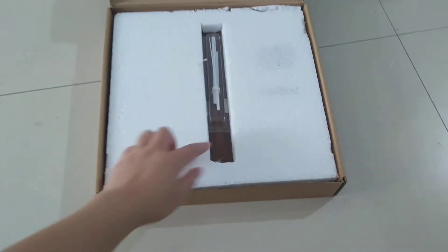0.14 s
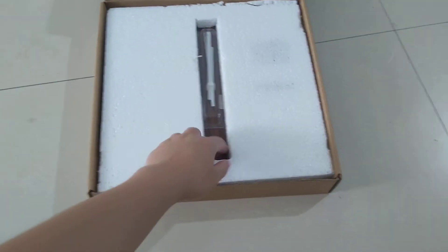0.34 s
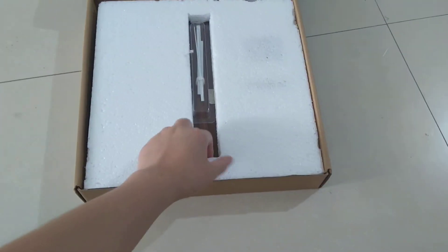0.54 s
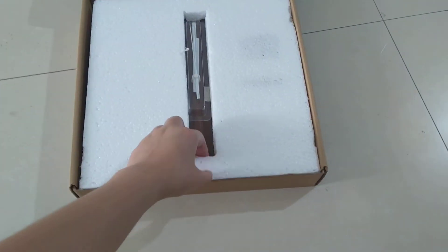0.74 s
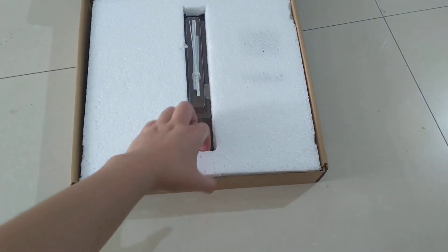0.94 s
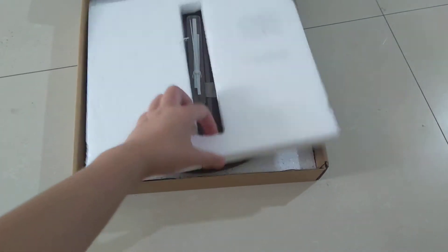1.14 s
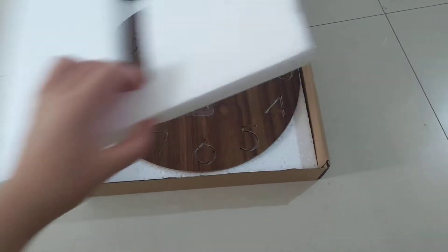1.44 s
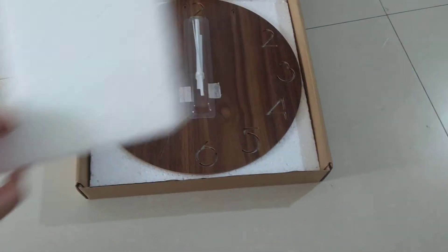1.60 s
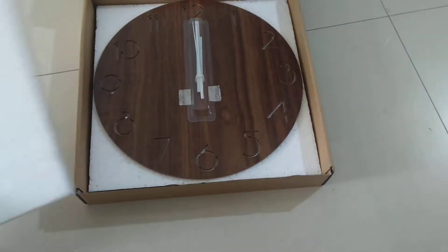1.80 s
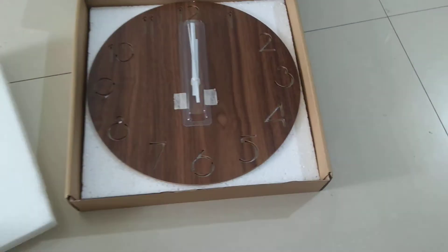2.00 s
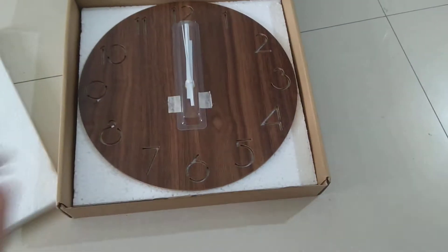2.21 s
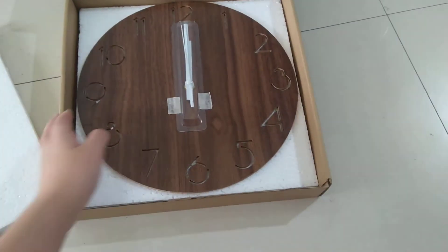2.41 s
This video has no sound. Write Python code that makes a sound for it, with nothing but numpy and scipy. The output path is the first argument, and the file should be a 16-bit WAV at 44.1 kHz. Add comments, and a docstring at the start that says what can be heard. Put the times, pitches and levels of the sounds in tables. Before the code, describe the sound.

Crisp foam rubbing against skin and cardboard, loudest in the first half and thinning later, after a brief hollow rattle with short room echo. Small snaps and dull bumps follow over low rumble, mostly on the right.

```python
"""In a bare room with a tiled floor, a hand rubs, grips and lifts a foam sheet out of a cardboard box.
The rubbing is patchy noise and tiny slips in three bands, with snaps, bumps and squeaks of filtered noise.
Just before, something hollow knocks and rattles: decaying sines and cracks, with a noise tail for the walls.
A low rumble of shaped noise and a trace of hiss lie under it all; most of the sound leans to the right."""
import sys
import numpy as np
from scipy import signal
from scipy.fft import rfft, irfft, next_fast_len
from scipy.io import wavfile
from scipy.ndimage import uniform_filter1d, minimum_filter1d, map_coordinates

SR = 44100
rng = np.random.default_rng(int(sys.argv[2]) if len(sys.argv) > 2 else 0)


def decibels_to_gain(level_db):
    """Convert a level in decibels to a linear amplitude gain (20 dB per decade)."""
    exponent = np.asarray(level_db, float) / 20
    return 10 ** exponent


def master(y):
    """Save y as 16-bit WAV."""
    cut = np.clip(np.atleast_2d(y).T, -1, 1)
    pcm = np.round(cut * 32767)  # scale
    wavfile.write(sys.argv[1], SR, pcm.astype(np.int16))


N = 112454  # length [samples]

# left-right likeness of the foam and of the walls' answer: (frequency [Hz], likeness [0..1])
FOAM_AND_WALLS_ALIKE = [(60, 1), (150, .95), (300, 1), (600, 0.62), (1000, .4), (2400, 0.033), (6000, 0.05),
                        (15000, 0.24)]


def unit(x):
    """Scales a signal to rms 1."""
    return x / np.sqrt(np.mean(x ** 2) + 1e-20)


def along(points, hz):
    """Reads (Hz, value) points on a logarithmic frequency axis."""
    f, v = np.transpose(points)
    return np.interp(np.log(hz + 1), np.log(f + 1), v)


def wobble(rate):
    """A smooth random curve through rate random knots a second."""
    knots = rng.standard_normal(int(N * rate / SR) + 4)
    return map_coordinates(knots, [np.arange(N) * rate / SR])


def filtered(x, response):
    """Multiplies the spectrum of x by a complex response of frequency."""
    m = next_fast_len(x.shape[-1] + SR // 4)
    spectrum = rfft(x, m) * response(np.fft.rfftfreq(m, 1 / SR))
    return irfft(spectrum, m)[..., :x.shape[-1]]


def spread(pair, colour, alike=FOAM_AND_WALLS_ALIKE):
    """Colours two unrelated signals and mixes them to a left-right likeness, at rms 1."""
    def mid_side_response(hz):
        angle = np.arccos(np.clip(along(alike, hz), 0, 1)) / 2
        return decibels_to_gain(along(colour, hz)) * [np.cos(angle), np.sin(angle)]

    mid, side = filtered(pair, mid_side_response)
    return unit(np.array([mid + side, mid - side]))


def patchy(depth_db):
    """Two noises whose gain varies in random patches of time and frequency, alike in both."""
    z = signal.stft(rng.standard_normal((2, N)), nperseg=512)[2]
    field = uniform_filter1d(rng.standard_normal(z.shape[1:]), 3, 0)  # across frequency
    field = uniform_filter1d(field, 14, 1)  # across time
    return unit(signal.istft(z * decibels_to_gain(depth_db * unit(field)), nperseg=512)[1][:, :N])


def grainy(depth_db):
    """Friction as tiny slips of uneven size, mixed with patchy noise."""
    slips_per_s, size_spread_db, slip_share = 2500, 3, 0.4  # share of the power
    slips = (rng.random((2, N)) < slips_per_s / SR) * rng.standard_normal((2, N))
    slips = unit(slips * decibels_to_gain(size_spread_db * rng.standard_normal(N)))
    return np.sqrt(slip_share) * slips + np.sqrt(1 - slip_share) * patchy(depth_db)


def add(track, s, sound):
    """Lays a sound into the track at s seconds."""
    part = track[..., round(s * SR):][..., :sound.shape[-1]]
    part += sound[..., :part.shape[-1]]


def burst(hz, width_hz, envelope):
    """A stereo puff of partly shared noise through a resonance passed twice, under an envelope."""
    noise = rng.standard_normal(len(envelope)) + 1.4 * rng.standard_normal((2, len(envelope)))

    def resonance(f):
        return (1j * f * width_hz / (hz * hz - f * f + 1j * f * width_hz)) ** 2

    return envelope * unit(filtered(noise, resonance))


def rubbing():
    """Foam beads slip on skin and cardboard: a bright fizz, a duller sheet scrape, a low rub of the box."""
    # strokes, before trims: (time [s], fizz level [dB], scrape level [dB], cardboard level [dB])
    strokes = [(.3, -73, -58.5, -75), (0.34, -39.5, -28, -19), (0.38, -41.5, -27, -14),
               (0.44, -40, -33, -27), (0.54, -41, -31, -30), (0.57, -31, -30, -29.5),
               (0.69, -50.5, -53.5, -50.5), (0.73, -33.5, -37.5, -50), (0.78, -39.5, -37, -43),
               (0.79, -31.5, -35, -38.5), (0.84, -32.5, -37, -43), (0.94, -39.5, -41, -48),
               (0.98, -32.5, -34.5, -44.5), (1.03, -34, -36, -48), (1.05, -33, -35, -41),
               (1.1, -23.5, -31, -37), (1.18, -34.5, -40.5, -54), (1.19, -31, -35.5, -35.5),
               (1.27, -34, -36.5, -48), (1.35, -36.5, -39, -50), (1.37, -31, -38.5, -50),
               (1.39, -30, -41.5, -50), (1.42, -36, -41.5, -54), (1.5, -44, -48.5, -62),
               (1.51, -46.5, -50, -64), (1.62, -50, -56, -78.5), (1.66, -35, -42.5, -57.5),
               (1.69, -35, -40.5, -54), (1.71, -37, -41, -54), (1.8, -42.5, -45, -69),
               (1.82, -43.5, -44, -58), (1.88, -48.5, -49.5, -72), (1.89, -43.5, -46.5, -52),
               (1.94, -49, -50, -64.5), (1.98, -51, -47, -60), (2.0, -52, -48, -67),
               (2.02, -52.5, -48, -56), (2.06, -30.5, -36.5, -51), (2.13, -42, -43, -52),
               (2.18, -48.5, -48, -67), (2.2, -49, -51.5, -62), (2.23, -42, -39, -65),
               (2.32, -45, -43.5, -58), (2.38, -44, -47.5, -64), (2.41, -50, -42, -46),
               (2.52, -58, -52, -59), (2.55, -74, -60, -72)]
    # colour of the fizzing beads: (frequency [Hz], relative level [dB per Hz])
    fizz_colour = [(1200, -90), (2600, -10), (3500, -10), (4100, -16.5), (4970, -8), (6500, -3.5),
                   (8310, 1), (9500, -3.5), (10300, -4.5), (11100, -8.5), (15200, -8), (16000, -9),
                   (16500, -96)]
    # colour of the scraping sheet: (frequency [Hz], relative level [dB per Hz])
    scrape_colour = [(700, -90), (950, -87), (1150, -3), (1400, -1.5), (2400, 0.5), (3270, -1), (4260, -3),
                     (5500, -6), (7150, -6.5), (12000, -97)]
    # colour of the rubbed cardboard: (frequency [Hz], relative level [dB per Hz])
    card_colour = [(380, -90), (480, -20), (560, -13), (660, -4), (850, 0), (1100, -2.5), (1400, -0.5),
                   (2000, -94)]
    scrape_full_s, scrape_rise_s = 0.62, 0.068  # scrape and cardboard rise up to this time
    flutter_db, stroke_s = 0.9, 0.23
    pan_share = 0.25  # dB towards the left for each dB that the fizz stands over its surroundings

    s, fizz_db, scrape_db, card_db = np.transpose(strokes)
    t = np.arange(N) / SR
    shared_db = 0.7 * wobble(14)
    fizz_level = np.interp(t, s, fizz_db)

    fizz_gain = decibels_to_gain(fizz_level + 1.5 + shared_db + flutter_db * wobble(40))
    fizz = fizz_gain * spread(grainy(4.5), fizz_colour)
    scrape_gain = decibels_to_gain(np.interp(t, s, scrape_db) + 0.5 + shared_db + flutter_db * wobble(29.34))
    scrape = scrape_gain * spread(grainy(2.2), scrape_colour)
    card_gain = decibels_to_gain(np.interp(t, s, card_db) + 1 + shared_db)
    card = card_gain * spread(patchy(2.6), card_colour)

    rise = np.clip((t - scrape_full_s) / scrape_rise_s + 1, 0, 1)
    pan_db = pan_share * (fizz_level - uniform_filter1d(fizz_level, round(stroke_s * SR)))
    return decibels_to_gain(pan_db * [[0.5], [-0.5]]) * (fizz + (scrape + card) * rise) * (t > s[0])


def snaps():
    """Foam beads snap free, each a broad burst of noise that dies at once."""
    # beads snapping: (time [s], level [dB], centre frequency [Hz])
    beads = [(0.7128, -29.5, 8190), (0.787, -25, 8080), (0.8045, -31.5, 8480), (0.8364, -36, 8090),
             (1.5803, -34, 7980), (1.6397, -32.5, 3100), (1.735, -40, 9000), (1.8835, -38, 2580),
             (2.2169, -40, 2490), (2.2694, -40, 2760)]
    t60_s = 0.019
    out, t = np.zeros((2, N)), np.arange(SR // 4) / SR
    for s, db, hz in beads:
        add(out, s, decibels_to_gain(db) * burst(hz, 1.7 * hz, decibels_to_gain(-60 * t / t60_s)))
    return out


def bumps():
    """The sheet bumps box and floor: low bursts of noise with a soft attack."""
    # bumps, level before the attack softens them: (time [s], level [dB], centre frequency [Hz])
    thuds = [(1.128, -31.5, 217), (1.195, -29.5, 147), (1.691, -48, 151), (2.055, -38.5, 208),
             (2.217, -57, 207), (2.397, -39, 186)]
    t60_s, attack_s = 0.13, 0.0091
    out, t = np.zeros((2, N)), np.arange(SR // 4) / SR
    for s, db, hz in thuds:
        envelope = decibels_to_gain(-60 * t / t60_s) * (1 - np.exp(-t / attack_s))
        add(out, s, decibels_to_gain(db) * burst(hz, 1.85 * hz, envelope))
    return out


def squeaks():
    """Faint squeaks of foam: noise through a narrow resonance, swelling and fading."""
    # squeaks: (time [s], length [s], level [dB], frequency [Hz], width [Hz])
    chirps = [(1.88, .025, -47, 2550, 300), (2.045, .04, -37, 2520, 220), (2.08, .17, -51, 655, 30)]
    out, t = np.zeros((2, N)), np.arange(SR // 4) / SR
    for s, length, db, hz, width_hz in chirps:
        swell = np.sin(np.pi * np.clip(t / length, 0, 1))
        add(out, s, decibels_to_gain(db) * burst(hz, width_hz, swell))
    return out


def knocks():
    """Each contact cracks and rings the hollow body; the walls answer with a tail dying band by band."""
    # knocks and rattle: (time [s], relative level of ring and walls [dB], crack level [dB])
    hits = [(0.213, 0, -33), (0.2195, -4.5, -37), (0.238, -5.5, -33), (0.255, -5.5, -45), (0.284, -10, -47),
            (0.314, -5.5, -49), (0.356, -7, -43.5), (0.367, -7, -49), (0.403, -11, -45.5)]
    # modes of the hollow body: (frequency [Hz], relative level before scatter [dB], t60 [s])
    modes = [(119.8, -18, 0.93), (140.3, -19.5, 1), (597, -9, 0.9), (638, 5.5, 0.21), (700, 5, 0.0091),
             (763.7, -3, 0.17), (774, -26, 0.13), (860.6, -6, 0.6), (977, -5, 0.067), (990, -19, 0.17),
             (1058, -13, 0.078), (1244, -7, .2), (1360, -27, .2), (1588, -5, 0.16), (2222, -8, .2)]
    # colour of the knock as the walls return it: (frequency [Hz], relative level [dB per Hz])
    wall_colour = [(30, -86), (90, -22.5), (170, -23.5), (300, -19.5), (520, -17.5), (620, 2.5), (700, -13),
                   (900, -8.5), (1210, -11.5), (1500, -18.5), (2400, -21.5), (3800, -28.5), (5700, -41),
                   (8300, -38.5), (14000, -64)]
    # decay of the room: (frequency [Hz], t60 [s])
    room_t60 = [(120, .9), (300, .6), (600, .5), (1000, .48), (1800, .55), (3000, .6), (9000, .35)]
    ring_db, ring_attack_s, mode_scatter_db = -15.5, 0.00057, 2.5
    walls_db, walls_build_s = -12.5, 0.0018
    crack_t60_s = 0.0046

    out, t = np.zeros((2, N)), np.arange(SR) / SR
    for s, db, crack_db in hits:
        ring = np.zeros((2, SR))
        for mode_hz, level, t60 in modes:
            mode_db = level + mode_scatter_db * rng.standard_normal((2, 1))  # per channel
            ring += decibels_to_gain(mode_db - 60 * t / t60) * np.sin(2 * np.pi * mode_hz * t)
        add(out, s, decibels_to_gain(db + ring_db) * ring * (1 - np.exp(-t / ring_attack_s)))

        add(out, s, decibels_to_gain(crack_db - 60 * t / crack_t60_s) * rng.standard_normal(SR))

        noise = spread(rng.standard_normal((2, SR)), wall_colour)
        hz, frames, z = signal.stft(noise, SR, nperseg=256)
        decay = decibels_to_gain(-60 * frames / along(room_t60, hz)[:, None])
        tail = signal.istft(z * decay, SR, nperseg=256)[1][:, :SR]
        add(out, s, decibels_to_gain(db + walls_db) * tail * (1 - np.exp(-t / walls_build_s)))
    return out


def rumble():
    """The low rumble of the building: dark noise, wavering in level."""
    # colour of the rumble: (frequency [Hz], relative level [dB per Hz])
    rumble_colour = [(13, -49), (22, -35), (65, -3), (108, -7), (141, -4.5), (207, -7), (226, -16.5),
                     (304, -9.5), (350, -15.5), (393, -12), (470, -32), (610, -56), (1030, -120)]
    # course of the rumble, before the waver: (time [s], level [dB])
    rumble_course = [(0, -47), (.3, -45.5), (.7, -44), (1.0, -48.5), (1.3, -47.5), (1.549, -48), (1.8, -49),
                     (2.0, -45.5), (2.25, -47), (2.55, -45)]
    # left-right likeness, below 0 taken as 0: (frequency [Hz], likeness)
    rumble_alike = [(60, 1), (380, 0.4), (2380, -0.088), (15000, 0.02)]
    level_db = np.interp(np.arange(N) / SR, *np.transpose(rumble_course)) + 1.05 * wobble(5.99)
    return decibels_to_gain(level_db) * spread(patchy(0.77), rumble_colour, rumble_alike)


def hiss():
    """A steady trace of patchy noise above the rumble."""
    # colour of the hiss: (frequency [Hz], relative level [dB per Hz])
    hiss_colour = [(400, -64), (500, -12), (900, -10), (2000, -21), (16000, -29)]
    return decibels_to_gain(-77.5) * spread(patchy(2.7), hiss_colour)


def scene():
    """All sources together, fading in softly."""
    fade_in_s = 0.012
    mix = rubbing() + snaps() + bumps() + squeaks() + knocks() + rumble() + hiss()
    return mix * np.sin(np.pi / 2 * np.clip(np.arange(N) / SR / fade_in_s, 0, 1)) ** 2


def roll_off(x):
    """The treble ends steeply here."""
    return signal.sosfilt(signal.butter(12, 16300, fs=SR, output="sos"), x)


def record(dry):
    """Two microphones: the right is louder, the left slightly earlier; lows roll off, a limiter holds peaks."""
    # left over right level: (frequency [Hz], level [dB])
    left_over_right = [(30, -.5), (70, -3.5), (150, -5), (300, -4.5), (600, -5.5), (1000, -8), (2400, -13),
                       (5000, -10.5), (9000, -6), (14000, -1.5)]
    left_lead_s, low_cut_hz = 0.0001964, 44
    limit_db, limit_hold_s = 0.5, 0.0057  # limit relative to full scale
    sides = np.array([[1], [-1]])

    def microphones(hz):
        level = decibels_to_gain(along(left_over_right, hz) / 2 * sides)
        delay = np.exp(1j * np.pi * hz * left_lead_s * sides)
        return level * delay / np.sqrt(1 + (low_cut_hz / (hz + 1)) ** 4)

    x = filtered(dry, microphones)
    hold = round(limit_hold_s * SR)
    gain = np.minimum(1, decibels_to_gain(limit_db) / (np.abs(x).max(axis=0) + 1e-9))
    x = x * uniform_filter1d(minimum_filter1d(gain, 2 * hold), hold)
    return roll_off(x)


dry = scene()
out = record(dry)
master(out)
```